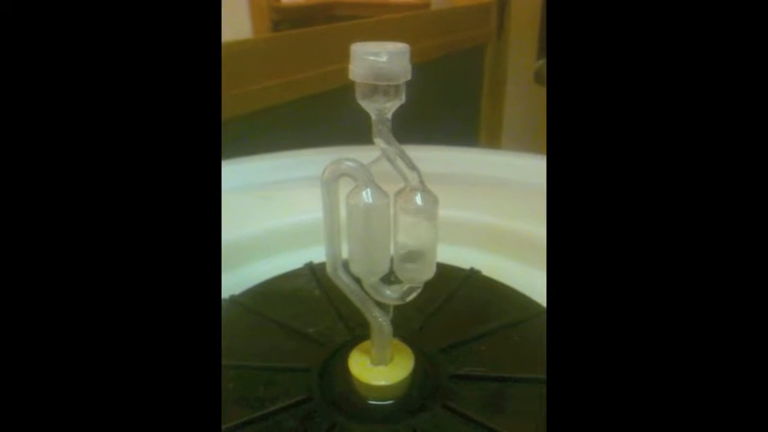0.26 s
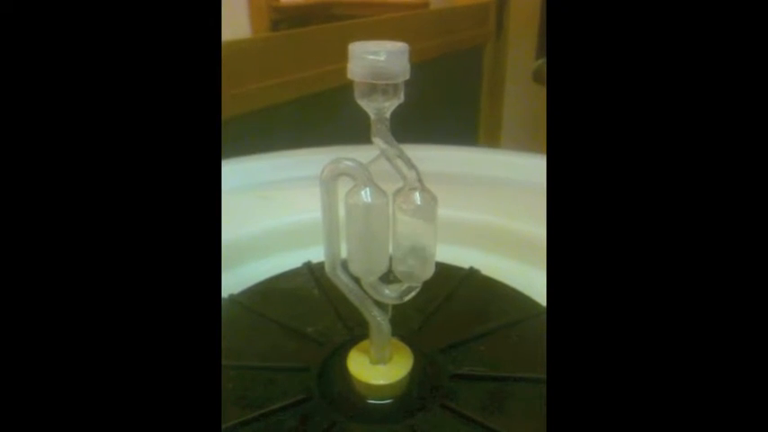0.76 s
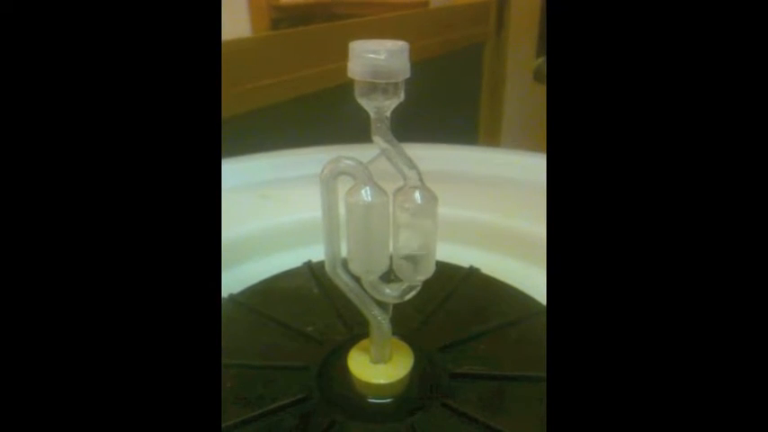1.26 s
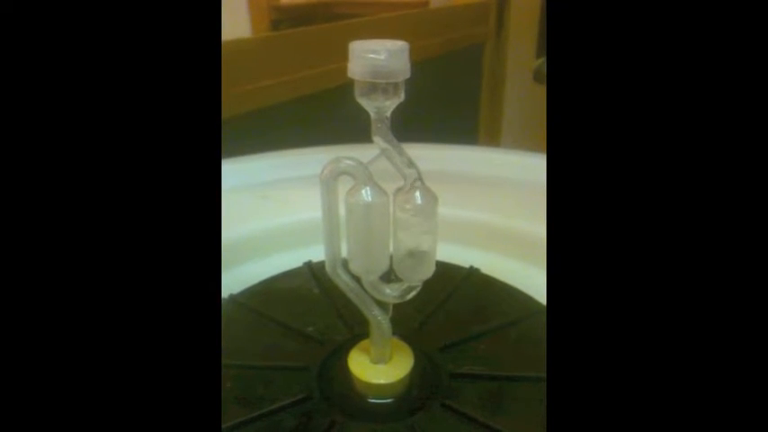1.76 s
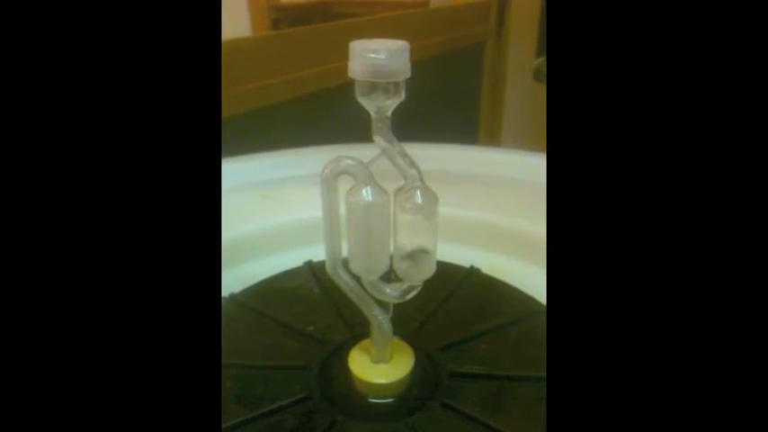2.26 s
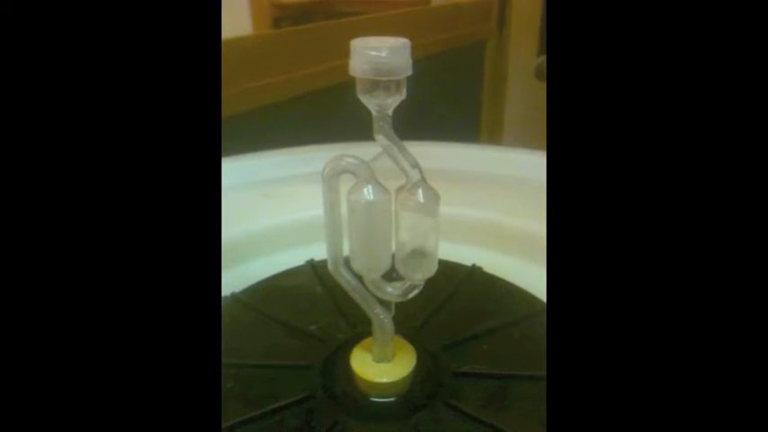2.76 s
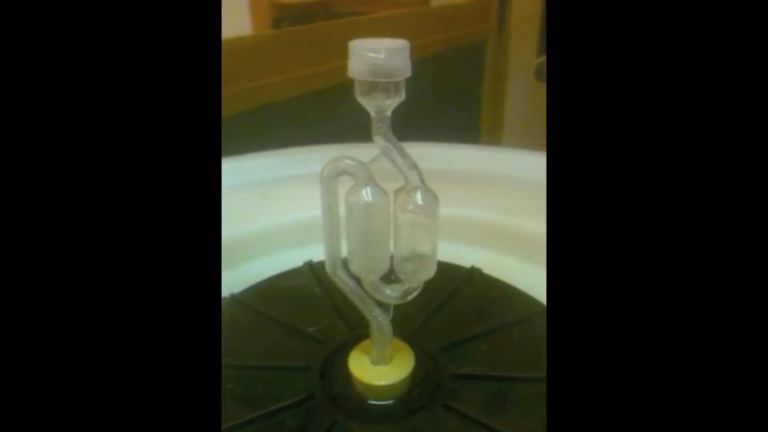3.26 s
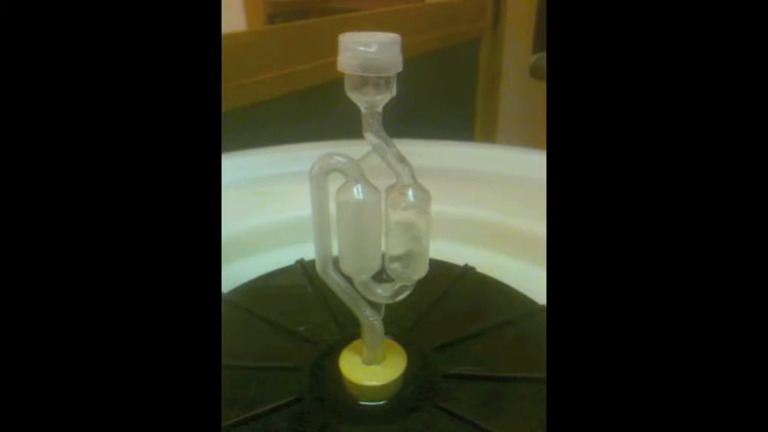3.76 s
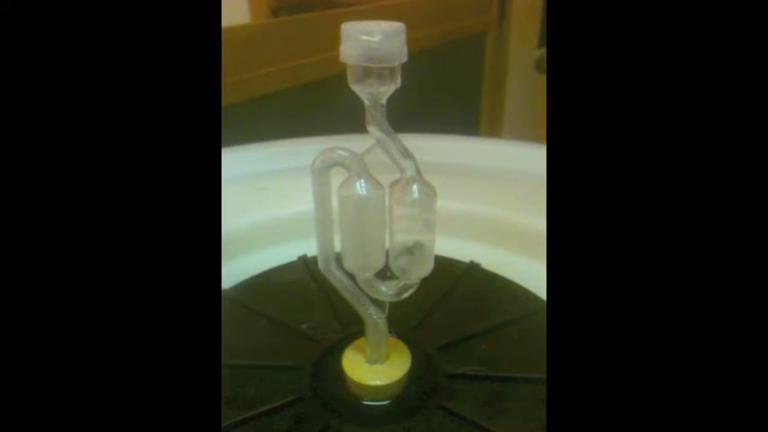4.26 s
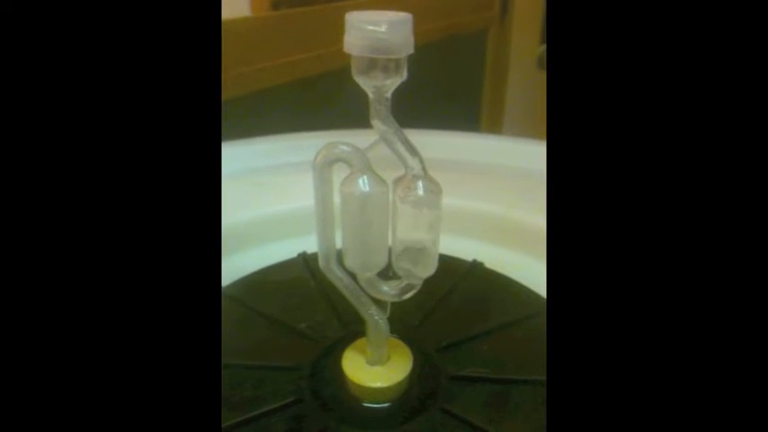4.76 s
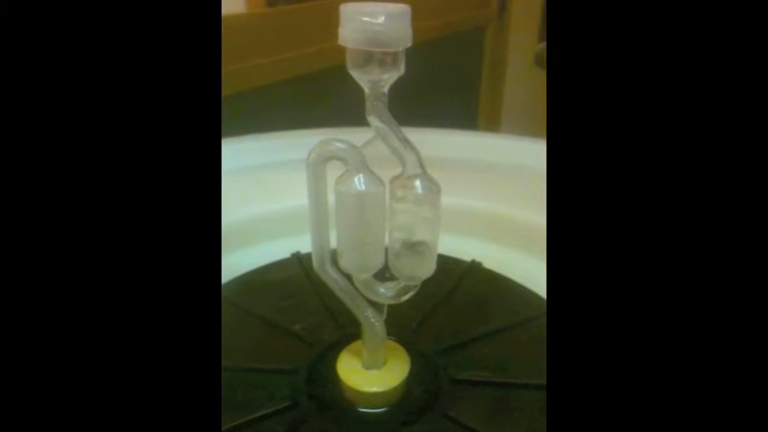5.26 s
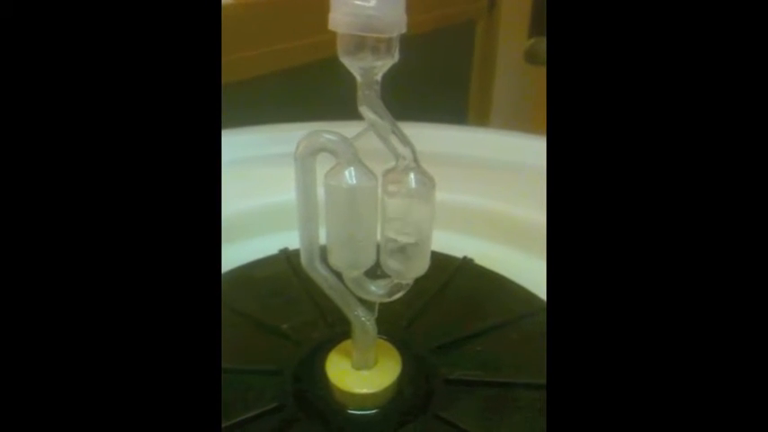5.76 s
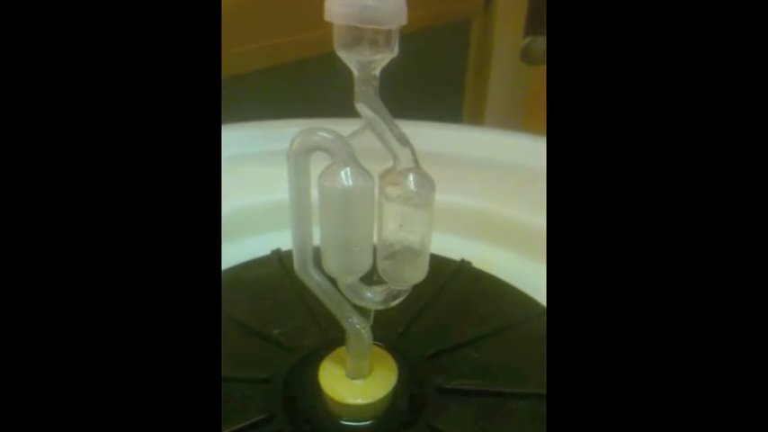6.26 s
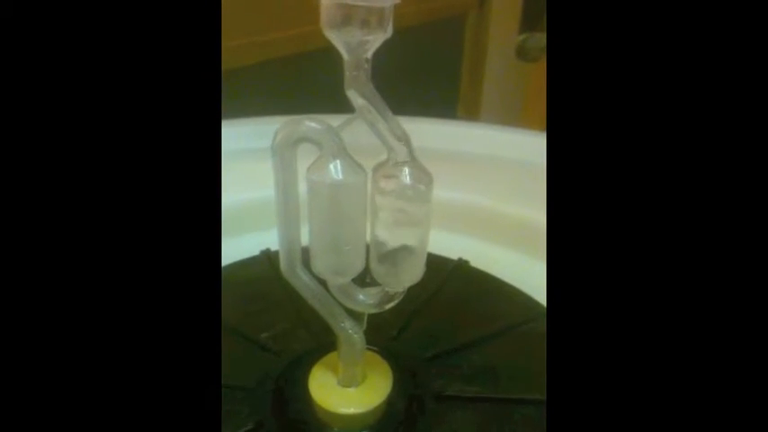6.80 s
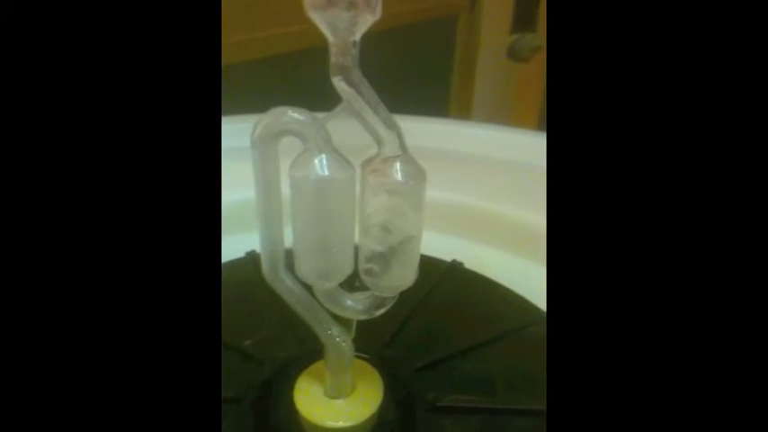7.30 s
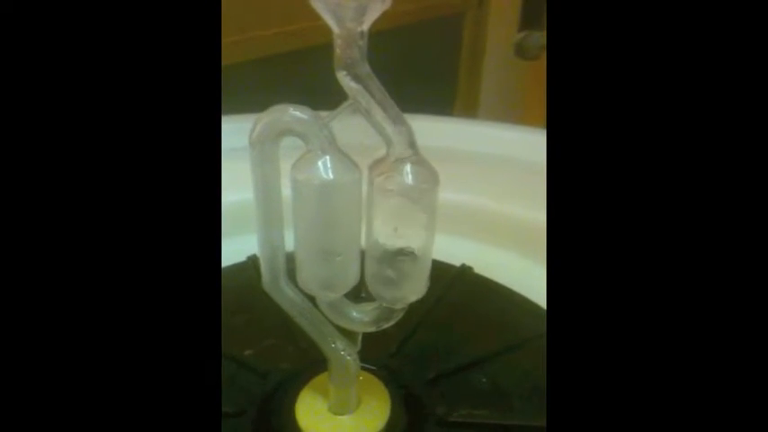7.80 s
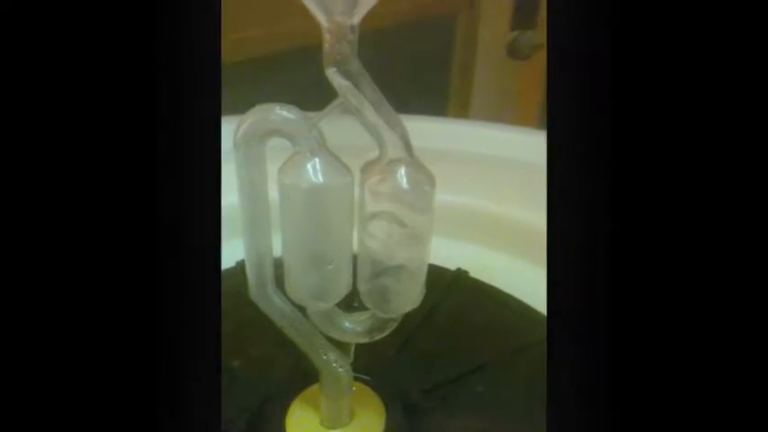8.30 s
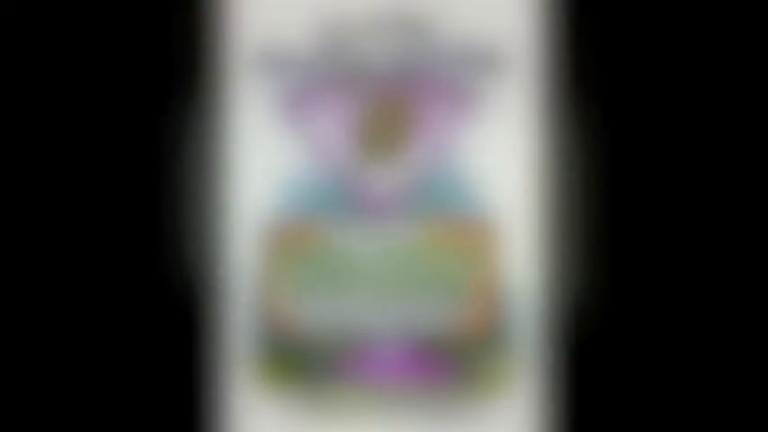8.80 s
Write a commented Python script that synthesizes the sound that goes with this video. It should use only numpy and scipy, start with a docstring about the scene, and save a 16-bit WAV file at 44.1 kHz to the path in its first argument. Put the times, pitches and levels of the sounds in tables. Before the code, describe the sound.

From the start, gas bubbles quickly through the water in a plastic airlock on a fermenting bucket, heard close up. Hollow glugs come unevenly, roughly a dozen a second, each bending up in pitch with a little slosh and a brief ring in the chambers. Small bright pops, thin ticks and short splutters of froth are scattered throughout, with clearer pops near 1.5 and 4 seconds and sharper ticks between about 3 and 7 seconds. A faint hum and hiss from a quiet room lie underneath. There is a soft low bump on the hand-held microphone at the very start, then a few more dull bumps and light finger rub from about 4.6 to 5.8 seconds. From around 5.3 seconds the whole sound gradually fades, the bubbling keeping its pace, until it is gone at about 8.2 seconds.

```python
"""Quick, hollow glugs as gas from a fermenting bucket hurries through a plastic airlock's water trap.
Big bubbles bend up in pitch as they near the surface, slosh the water and set the chambers ringing.
Small ones pop, films of froth tick in the tube, and clumps of it collapse in splutters.
Soft bumps and finger rub reach the hand-held microphone over the hum of a quiet room.
The whole sound fades out over the last few seconds."""
import sys
import numpy as np
from scipy import signal
from scipy.fft import rfft, irfft
from scipy.io import wavfile

SR = 44100
rng = np.random.default_rng(int(sys.argv[2]) if len(sys.argv) > 2 else 0)


def store_pcm(level_fs):
    """Save levels as 16-bit WAV."""
    pcm = np.round(np.clip(level_fs, -1, 1) * 32767).astype(np.int16)
    wavfile.write(sys.argv[1], SR, np.atleast_2d(pcm).T)


N = 398663
TIME = np.arange(N) / SR
CUTOFF_HZ = 16100
GLUG_HZ, GLUG_DB, RISE_OCTAVES_PER_S = 360, -29, 23   # a typical big bubble
SLOSH_LAG_S = .02   # the water answers just after each big bubble
TEAR_S = .0012   # decay of a tearing film's rasp

# the clearest big bubbles: t/s, starting f/Hz, relative level/dB, pitch climb/(octaves per s)
BIG_BUBBLES = [(0.0, 565, -17.5, 42), (0.12, 277.4, -28.5, 21.6), (0.193, 326, -29.5, 9),
               (0.237, 400, -21, 23), (0.384, 415, -26, 13.3), (0.445, 337, -28.5, 21),
               (0.484, 298, -26.5, 6.5), (0.564, 525, -17, 24), (0.653, 393, -24, 25.6),
               (0.773, 415, -25.5, 20.4), (0.858, 409, -16.5, 34), (0.924, 363, -28.5, 13.4),
               (1.032, 295, -25.5, 21.7), (1.11, 287, -25.5, 14), (1.328, 374, -21.5, 32.6),
               (1.402, 308, -20, 21.5), (1.485, 292, -24.5, 22), (1.61, 318, -28, 19),
               (1.668, 532, -22, 26), (1.761, 499, -16, 34), (1.822, 278, -22.5, 33), (1.879, 534, -27, 23),
               (2.006, 285, -23, 24), (2.172, 361, -22, 31), (2.234, 306, -25, 20),
               (2.368, 1240, -29.5, 27), (2.382, 292.6, -23.5, 28.5), (2.442, 327, -29, 9.5),
               (2.504, 444.5, -18.5, 27.6), (2.601, 264, -26, 21.4), (2.655, 342, -28.5, 12.4),
               (2.705, 530, -14.5, 19), (2.858, 573, -25.5, 26), (2.964, 400, -19, 27),
               (3.024, 284, -27.0, 40), (3.134, 338, -28.5, 18), (3.232, 285, -21, 19.4),
               (3.311, 373, -21.5, 20), (3.437, 267.7, -23.5, 18), (3.476, 428, -17, 26),
               (3.627, 408, -24, 28), (3.789, 376, -20.5, 17.3), (3.868, 282.2, -22, 15),
               (3.93, 451, -26, 16.6), (3.991, 364, -25.5, 29), (4.056, 311.7, -22.5, 24.6),
               (4.076, 529, -25, 23.4), (4.114, 1152, -23.5, 16), (4.139, 349, -24.5, 28.4),
               (4.228, 406, -23, 21.5), (4.249, 542, -22, 26.6), (4.349, 357, -23.5, 27),
               (4.499, 590, -24, 22.3), (4.541, 525, -21.5, 23), (4.673, 469, -23.5, 21),
               (4.759, 257.6, -23.5, 21), (4.82, 407, -22, 18.7), (4.952, 372, -24.5, 25),
               (5.03, 291, -26.5, 14.5), (5.067, 255, -18.5, 30), (5.148, 378, -21.5, 8.8),
               (5.231, 418, -21, 8), (5.349, 274, -30, 17.6), (5.495, 385, -25, 26),
               (5.565, 320.5, -22.5, 5.1), (5.588, 434, -29, 22.5), (5.736, 301, -25, 38.6),
               (5.862, 402, -29, 46), (5.999, 385, -24.5, 20.4), (6.095, 332, -23, 14.4),
               (6.188, 360, -23, 14.6), (6.286, 460, -25.5, 19), (6.437, 369, -28, 13.6),
               (6.528, 368, -20.5, 11), (6.779, 290, -24.5, 18), (6.845, 441, -18, 26.5),
               (6.885, 452, -23, 29), (6.922, 299, -26.5, 11.6), (7.162, 468, -17, 27.5),
               (7.276, 495, -23.5, 24), (7.337, 382, -24, 20), (7.397, 337, -26, 23), (7.571, 352, -19, 29),
               (7.68, 306, -23.5, 22), (7.858, 375, -26, 26), (7.933, 437, -20, 45), (8.015, 458, -13, 42),
               (8.091, 303, -24.5, 16)]
# air resonances of the chambers and the trough above them: f/Hz, width/Hz, gain/dB
CHAMBER_MODES = [(341, 24, 3.5), (424, 32, 0.5), (818, 50.5, 13), (995, 53, -24.5), (1180, 170, 8.5)]
# resonances of the plastic tube: f/Hz, width/Hz, gain/dB
TUBE_MODES = [(4487, 330, -8), (8160, 390, -11), (8980, 1100, 4.5), (12400, 1300, -2.5)]


def from_db(db):
    """Decibels to gain."""
    return 10 ** (np.asarray(db) / 20)


def curve(rows):
    """Breakpoints joined into a value per sample."""
    return np.interp(TIME, *np.transpose(rows))


def rms_one(x):
    """Scale to unit power."""
    return x / np.sqrt(np.mean(x ** 2))


def add(out, s, sound):
    """Mix a sound in at time s."""
    at = int(np.clip(s * SR, 0, N - 1))
    out[at:at + len(sound)] += sound[:N - at]


def band(x, low_hz, high_hz):
    """A gentle band-pass."""
    edges = [low_hz, min(high_hz, CUTOFF_HZ)]
    return signal.sosfilt(signal.butter(2, edges, "band", fs=SR, output="sos"), x)


def band_noise(low_hz, high_hz):
    """Band-passed noise at unit power."""
    return rms_one(band(rng.standard_normal(N), low_hz, high_hz))


def resonate(x, modes):
    """Each click sets every mode ringing at its own level."""
    out = 0
    for hz, width, db in modes:
        radius, angle = np.exp(-np.pi * width / SR), 2 * np.pi * hz / SR
        poles = [1, -2 * radius * np.cos(angle), radius ** 2]
        out = out + from_db(db) * signal.lfilter([0, np.sin(angle)], poles, x + 1e-18)
    return out


def bubble(hz, rise, ring_s, attack_cycles=1 / np.pi):
    """A pulsing gas pocket starts abruptly and climbs in pitch as the water above it thins."""
    t = np.arange(int(np.e * ring_s * SR)) / SR
    pitch = np.minimum(hz * 2 ** (rise * t), CUTOFF_HZ)
    envelope = (1 - np.exp(-hz * t / attack_cycles)) * np.exp(-(t / ring_s) ** 2)
    return envelope * np.sin(2 * np.pi * np.cumsum(pitch) / SR)


def spray(origins, count, scatter_s, low_hz, high_hz, cycles, level_db, spread_db, climb=0):
    """Tiny bubbles burst around each (t/s, level/dB) origin; the cluster climbs in octaves per s."""
    out = np.zeros(N)
    for s, db in origins:
        for when, size, strength, damping in rng.random((count, 4)):
            lag = scatter_s * (2 * when - 1)
            hz = low_hz * (high_hz / low_hz) ** size * 2 ** (climb * lag)
            grain = bubble(hz, RISE_OCTAVES_PER_S, cycles * (.5 + damping) / hz)
            add(out, s + lag, from_db(db + level_db - spread_db * strength) * grain)
    return out


def chambers(x):
    """The air above the water lifts some pitches and swallows others."""
    for hz, width, db in CHAMBER_MODES:
        b, a = signal.iirpeak(hz, hz / width, SR)
        x = x + (from_db(db) - 1) * signal.lfilter(b, a, x)
    return x


def glugs(big, typical_ring_s=.037, level_db=1.32, thud_db=-19):
    """Each big bubble pinches off with a thud that rings the chambers, then sings its way up."""
    tones, thuds = np.zeros(N), np.zeros(N)
    for s, hz, db, rise in big:
        # high, fast-climbing bubbles are nearer the surface and die sooner
        ring_s = typical_ring_s * GLUG_HZ / hz * (RISE_OCTAVES_PER_S / rise) ** .32
        ring_s *= from_db(GLUG_DB - db) ** .21   # a strong one spends itself sooner too
        add(tones, s, from_db(db + level_db) * bubble(hz, rise, ring_s, attack_cycles=.27))
        add(thuds, s, from_db([db]))
    churn = from_db(1.2 * band_noise(20, 130))   # churning water roughens the tone
    hollow_ring = resonate(band(thuds, 220, 1700), CHAMBER_MODES)
    return chambers(tones * churn) + from_db(thud_db) * hollow_ring


def handling(decay_s=.012, bump_db=-.5):
    """Dull knocks on the microphone's case, over the tremor and uneven rub of the holding hand."""
    # soft bumps: t/s, relative level/dB
    bumps = [(0.0, -11.5), (4.692, -17.5), (4.978, -26), (5.069, -29.5), (5.398, -39), (5.627, -28),
             (6.285, -25), (7.395, -27), (7.92, -22)]
    # hand tremor: t/s, level/dB
    tremor_levels = [(0, -35), (4.5, -35), (5.2, -31.5), (6, -42)]
    # finger rub, swelling for about a second: t/s, level/dB
    rub_levels = [(4.55, -53), (4.7, -42.5), (5.1, -42), (5.62, -39.5), (5.8, -47.5)]
    tremor = from_db(curve(tremor_levels)) * band_noise(4.8, 27)
    grip_db = 5 * band_noise(4, 25)
    force = from_db(curve(rub_levels) + grip_db)
    for s, db in bumps:
        add(force, s, from_db(db + bump_db) * np.exp(-TIME[:SR] / decay_s))
    return tremor + force * band_noise(48, 230)


def room_tone(level_db=-44, hum_hz=60, hum_db=-48, whine_hz=12960, whine_db=-68):
    """A bed of rumble and hiss with mains hum and a thin electronic whine."""
    # spectrum of room rumble and microphone hiss: f/Hz, relative level/dB
    noise_floor = [(25, -21), (65, -27), (120, -32), (400, -6.5), (1000, -22.5), (4000, -23.5), (6500, -36),
                   (15000, -35.5)]
    hz, db = np.transpose(noise_floor)
    bin_hz = np.arange(N // 2 + 1) * SR / N
    colour = from_db(np.interp(np.log(bin_hz + 1), np.log(hz), db))
    noise = rms_one(irfft(rfft(rng.standard_normal(N)) * colour, N))
    hum = from_db(hum_db) * np.sin(2 * np.pi * hum_hz * TIME)
    whine = from_db(whine_db) * np.sin(2 * np.pi * whine_hz * TIME)
    return from_db(level_db) * noise + hum + whine


def slosh(big):
    """Each big bubble sheds a gurgle of fragments whose pitches climb with its own."""
    return sum(spray([(s + SLOSH_LAG_S, db)], count=5, scatter_s=SLOSH_LAG_S, low_hz=.9 * hz,
                     high_hz=3.1 * hz, cycles=2.9, level_db=-3, spread_db=9.5, climb=rise)
               for s, hz, db, rise in big)


def splash(big, follow=.14):
    """Droplets and finer fizz scatter around each big bubble, a little harder for a strong one."""
    wakes = [(s + SLOSH_LAG_S, follow * (db - GLUG_DB)) for s, hz, db, rise in big]
    droplets = spray(wakes, count=24, scatter_s=.06, low_hz=992, high_hz=4970,
                     cycles=6.5, level_db=-27.5, spread_db=34)
    fizz = spray(wakes, count=3, scatter_s=.06, low_hz=3780, high_hz=10000,
                 cycles=17, level_db=-31, spread_db=26)
    return droplets + fizz


def pops(typical_hz=2000, typical_ring_s=.0029, sweep_octaves=.22, level_db=15, snap_db=-21):
    """Small bubbles open at the surface: a snap of the film and a short rising ping."""
    # the loudest surface bubbles: t/s, starting f/Hz, relative level/dB
    small_bubbles = [(0.01, 3380, -25.5), (0.554, 3860, -27.5), (0.569, 1110, -29.5), (0.647, 4180, -31.5),
                     (1.034, 1100, -33), (1.542, 1534, -20), (1.577, 1075, -29), (1.765, 980, -29.5),
                     (2.309, 1030, -27.5), (2.366, 2460, -25.5), (2.631, 3900, -32), (2.882, 3340, -34),
                     (3.315, 4250, -29), (3.392, 1180, -27), (3.478, 1570, -31.5), (3.766, 1940, -33),
                     (3.984, 3640, -19), (4.178, 1950, -35), (4.251, 1180, -30.5), (4.404, 1145, -24.5),
                     (4.964, 2760, -29), (5.499, 3300, -30.5), (5.58, 4300, -29.5), (6.605, 3960, -28),
                     (6.903, 2240, -30), (7.158, 1334, -24), (7.589, 2090, -21.5), (8.021, 2430, -25)]
    pings, snaps = np.zeros(N), np.zeros(N)
    for s, hz, db in small_bubbles:
        ring_s = typical_ring_s * (typical_hz / hz) ** .55   # higher ones die sooner
        rise = sweep_octaves / max(ring_s, .003)
        add(pings, s, from_db(db + level_db) * bubble(hz, rise, ring_s))
        add(snaps, s, from_db([db]))
    return pings + from_db(snap_db) * resonate(snaps, TUBE_MODES)


def tube(x, click_db=8.5):
    """A dry click together with its ring in the plastic tube."""
    return resonate(x, TUBE_MODES) + from_db(click_db) * x


def crackle(per_s, level_db, low_hz, high_hz, spread_db=24):
    """Countless faint films tear in flurries."""
    flurry = band_noise(2.2, 20) ** 2
    tears = rng.random(N) < flurry * per_s / SR
    strength = from_db(level_db - spread_db * np.sqrt(rng.random(N)))
    envelope = signal.lfilter([1], [1, -np.exp(-1 / (TEAR_S * SR))], tears * strength + 1e-18)
    return tube(band(envelope * rng.standard_normal(N), low_hz, high_hz))


def weak_bubbles(pace_per_s=13, level_db=-23.5, spread_db=11, low_hz=275, high_hz=380, jitter_s=.014):
    """The gas never rests: weaker bubbles fill the gaps between clear ones. Rows as in BIG_BUBBLES."""
    rows, starts = [], np.array(BIG_BUBBLES)[:, 0]
    for s, gap, chances in zip(starts, np.diff(starts), rng.random((len(starts), 4, 3))):
        steps = round(gap * pace_per_s + .15)
        for k, (lag, size, strength) in zip(range(1, steps), chances):
            onset = s + gap * k / steps + jitter_s * (2 * lag - 1)
            hz = low_hz * (high_hz / low_hz) ** size
            rows.append((onset, hz, level_db - spread_db * strength, RISE_OCTAVES_PER_S))
    return rows


def ticks(band_ratio=2.04):
    """Single films snap with a brief rasp: a thin tick from a small one, a fuller crack from a large."""
    # snapping films: t/s, lower band edge f/Hz, peak level/dB
    film_snaps = [(0.175, 7500, -25), (0.288, 7500, -25), (0.349, 7500, -23.5), (1.021, 7000, -22.5),
                  (1.184, 7500, -23.5), (1.888, 7500, -25), (2.285, 6700, -15.5), (2.488, 595, -28),
                  (3.09, 3400, -14.5), (3.335, 3500, -17), (3.404, 8250, -15), (3.631, 695, -19),
                  (3.712, 4800, -13), (4.251, 1590, -16.5), (4.34, 1980, -22), (4.819, 705, -20.5),
                  (4.855, 6900, -23), (5.203, 940, -17.5), (5.707, 10700, -27.5), (5.929, 7500, -23),
                  (6.133, 2620, -19), (6.148, 1620, -10.5), (6.369, 2820, -16.5), (6.481, 3350, -15.5),
                  (6.614, 8150, -19), (6.644, 2180, -14.5), (6.821, 7500, -19), (6.881, 1840, -5),
                  (7.077, 8100, -16.5), (7.091, 1900, -11.5)]
    out, t = np.zeros(N), TIME[:int(20 * TEAR_S * SR)]
    for s, hz, db in film_snaps:
        rasp = rng.standard_normal(SR)[:len(t)] * np.exp(-t / TEAR_S)
        snap = tube(band(rasp, hz, hz * band_ratio))
        add(out, s, from_db(db) * snap / np.abs(snap).max())
    return out


def splutters(pitch_spread=1.68, scatter_cycles=15):
    """A clump of froth gives way in a quick, rising run of tiny bursts; coarse froth takes longer."""
    # collapsing clumps: t/s, centre f/Hz, relative level/dB
    clumps = [(1.525, 3240, -41), (1.682, 3310, -31.5), (1.96, 2810, -35), (2.011, 1473, -35),
              (2.172, 3720, -31.5), (2.613, 2470, -32), (2.884, 2810, -31), (3.327, 1814, -31),
              (4.102, 866, -33), (4.269, 2580, -34.5), (4.284, 3360, -38), (4.359, 1900, -32.5),
              (4.507, 1390, -30.5), (4.528, 1375, -36.5), (4.695, 1194, -31), (5.944, 3700, -31),
              (6.456, 1690, -35.5), (6.93, 3120, -28.5)]
    return sum(spray([(s, db)], count=14, scatter_s=scatter_cycles / hz,
                     low_hz=hz / pitch_spread, high_hz=hz * pitch_spread,
                     cycles=5.6, level_db=12, spread_db=21.5, climb=RISE_OCTAVES_PER_S)
               for s, hz, db in clumps)


def reflections(x, t60, wet_db, dull_hz):
    """A diffuse, dulled tail from nearby surfaces."""
    t = TIME[:SR // 2]
    tail = rng.standard_normal(len(t)) * from_db(-60 * t / t60) * (t > .002)   # 2 ms pre-delay
    lowpass = signal.butter(1, dull_hz, fs=SR, output="sos")
    tail = signal.sosfilt(lowpass, tail / np.linalg.norm(tail))
    return from_db(wet_db) * signal.fftconvolve(x, tail)[:N]


def scene():
    """The airlock up close, with short reflections off the lid just under it and a faint room."""
    big = list(BIG_BUBBLES) + weak_bubbles()
    water = splash(big) + glugs(big) + chambers(slosh(big)) + pops() + splutters()
    films = ticks()
    films += crackle(per_s=81, level_db=-34.5, low_hz=1600, high_hz=5170)
    films += crackle(per_s=45, level_db=-40.5, low_hz=7400, high_hz=14000)
    lid = reflections(water, t60=.06, wet_db=-13, dull_hz=9000)
    room = reflections(water + films, t60=.16, wet_db=-12.5, dull_hz=3410)
    return (water + films + lid + room + room_tone() + handling())[None]


def record(dry):
    """The mix fades out and the very top is cut steeply."""
    # master fade: t/s, gain/dB
    fade_out = [(5.3, 0), (6.6, -6), (7.5, -14), (7.92, -21), (8.12, -34), (8.22, -70)]
    top_cut = signal.ellip(10, .1, 80, CUTOFF_HZ, fs=SR, output="sos")
    return signal.sosfilt(top_cut, dry * from_db(curve(fade_out)))


dry = scene()
out = record(dry)
store_pcm(out)
```